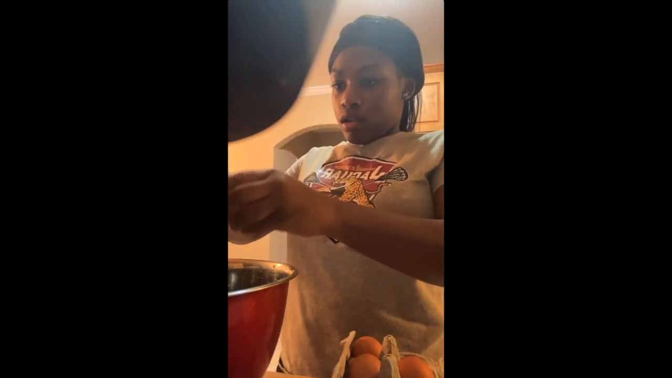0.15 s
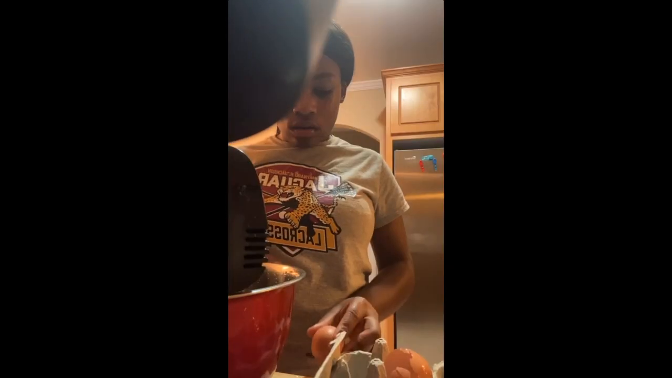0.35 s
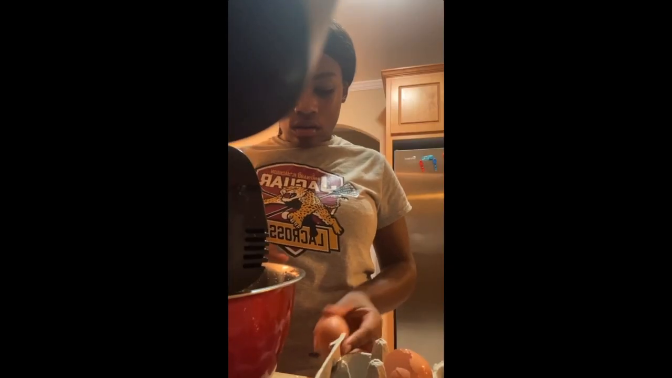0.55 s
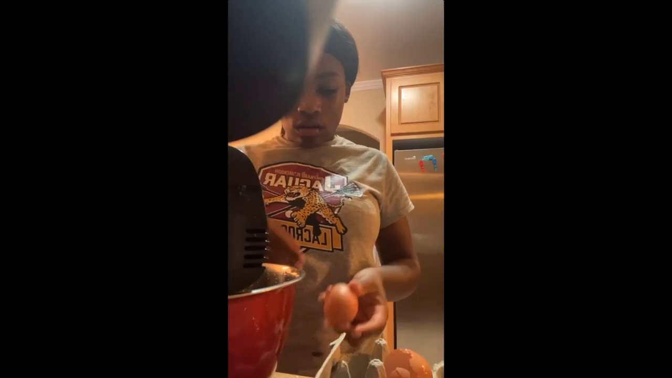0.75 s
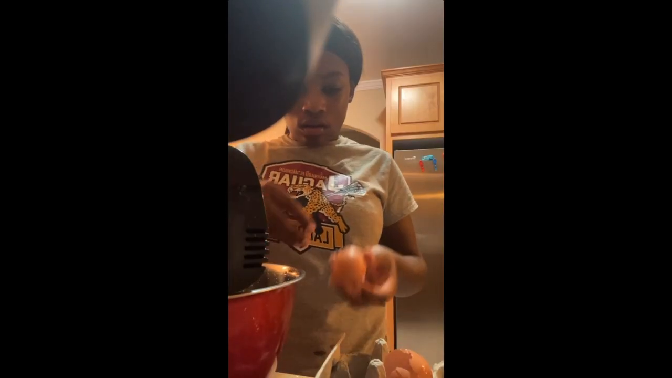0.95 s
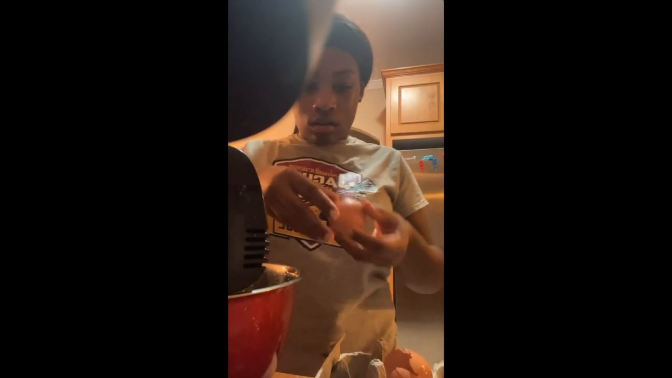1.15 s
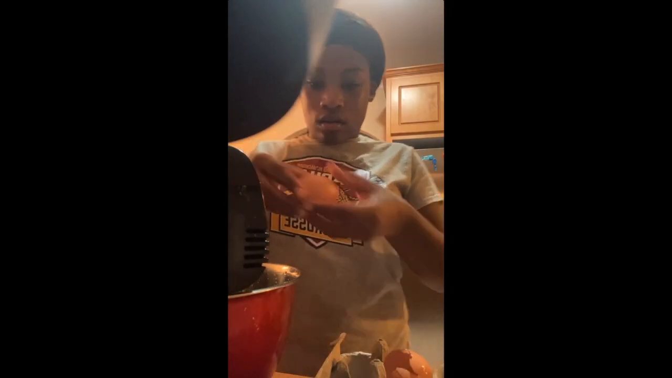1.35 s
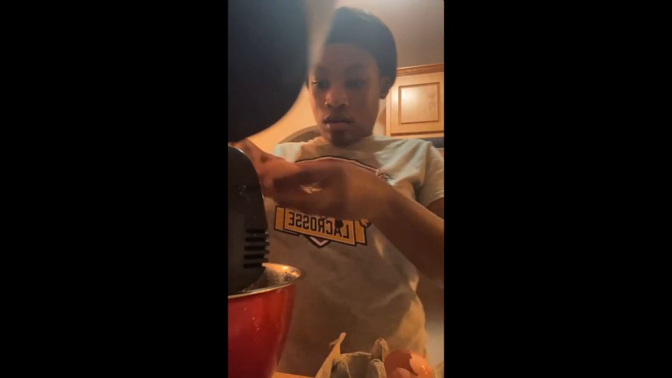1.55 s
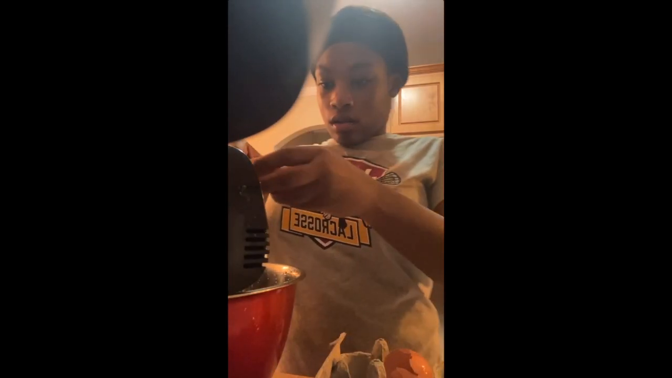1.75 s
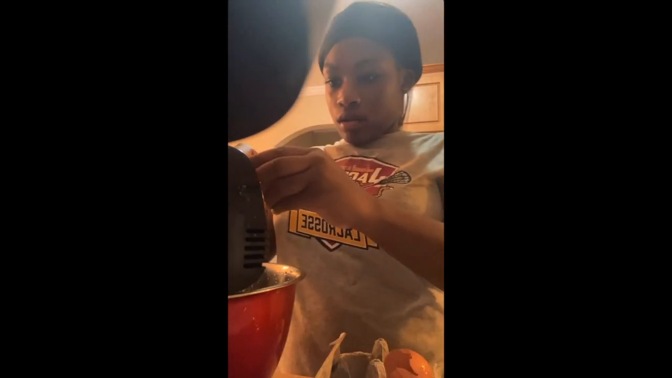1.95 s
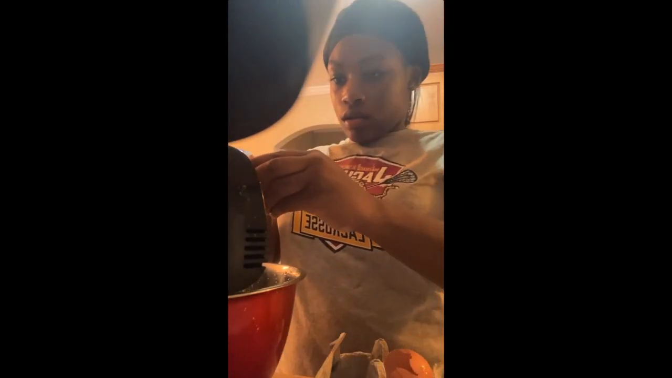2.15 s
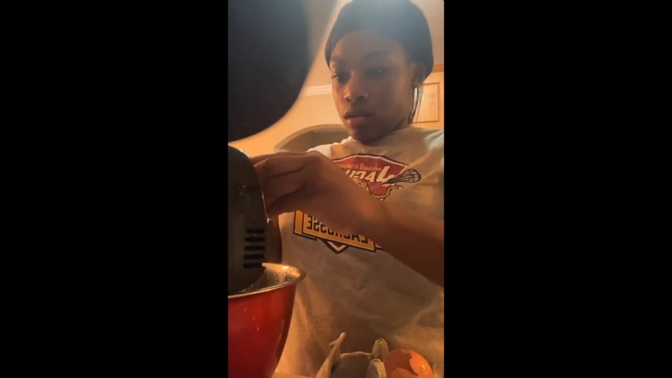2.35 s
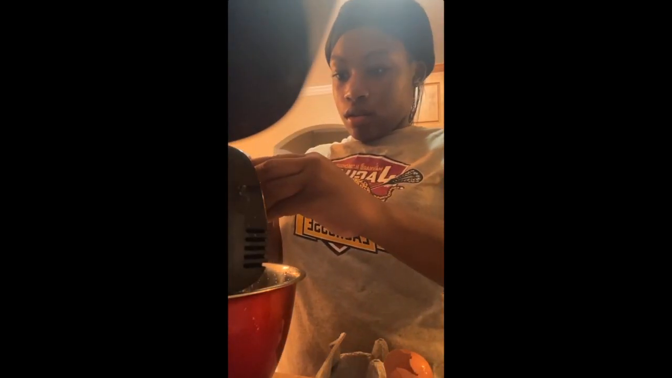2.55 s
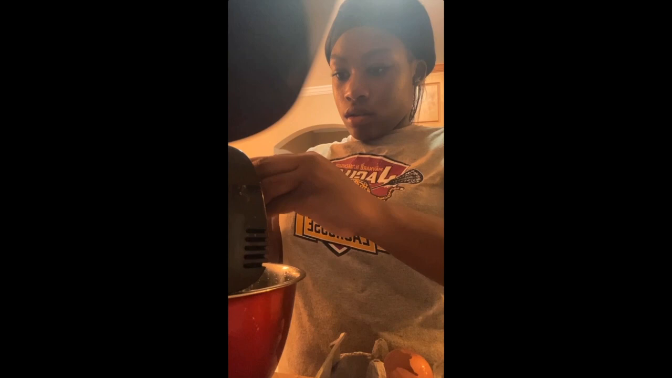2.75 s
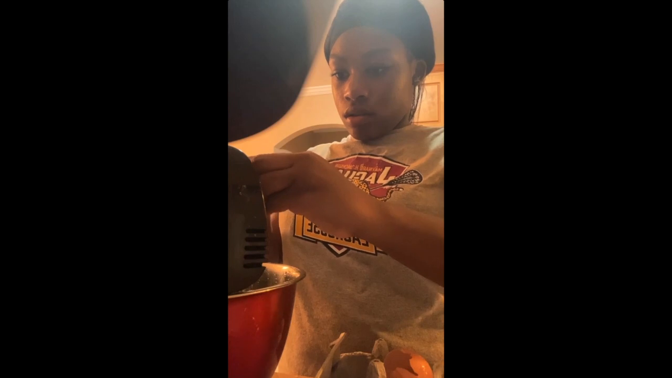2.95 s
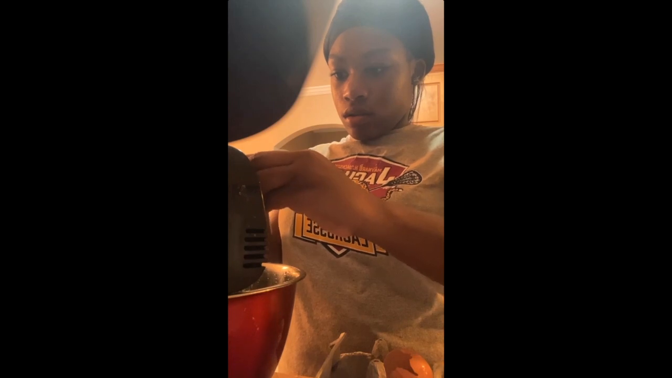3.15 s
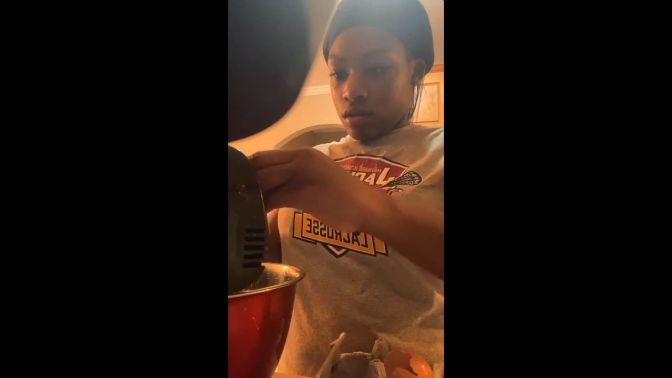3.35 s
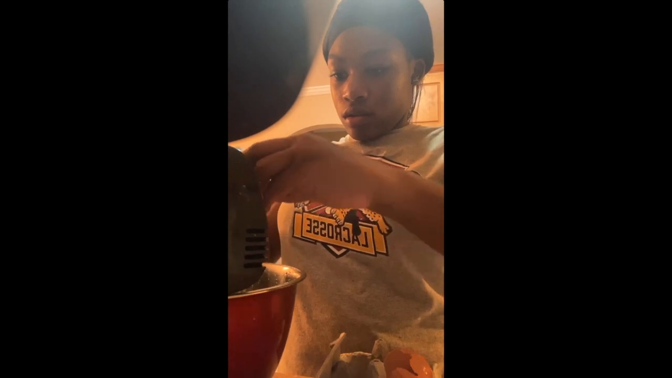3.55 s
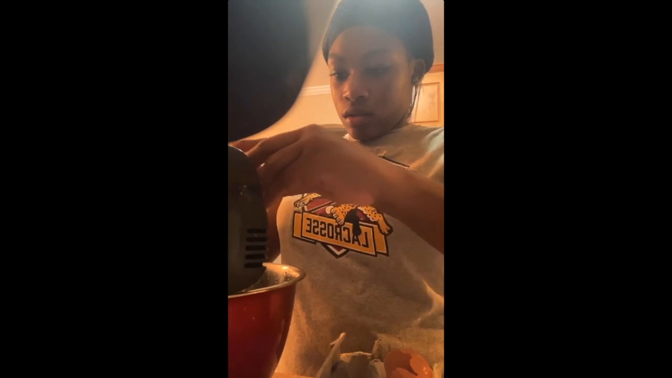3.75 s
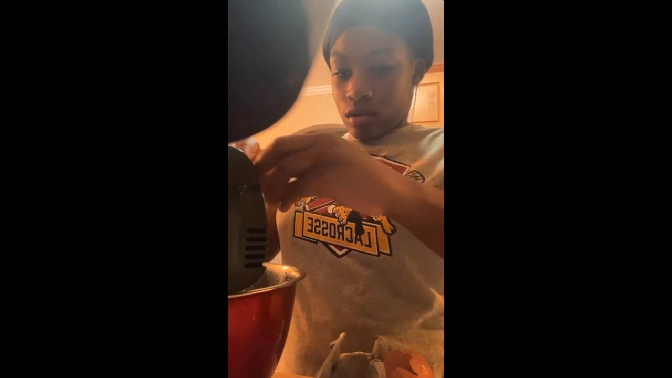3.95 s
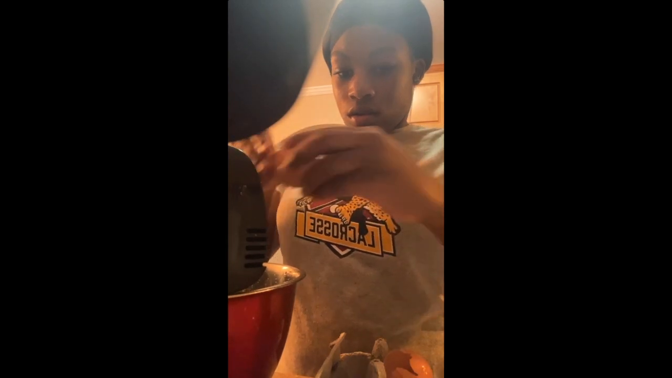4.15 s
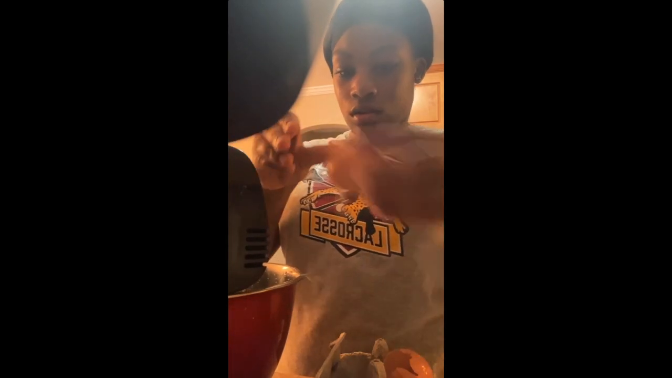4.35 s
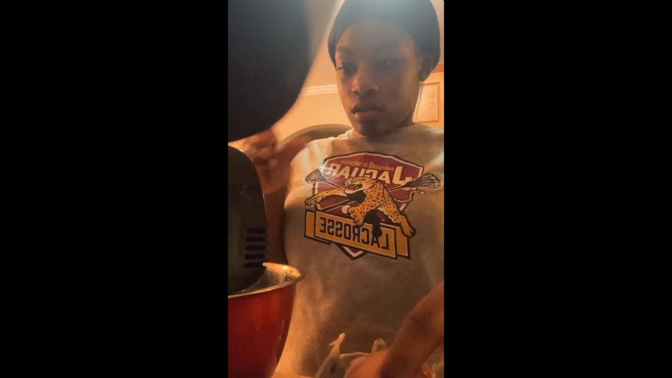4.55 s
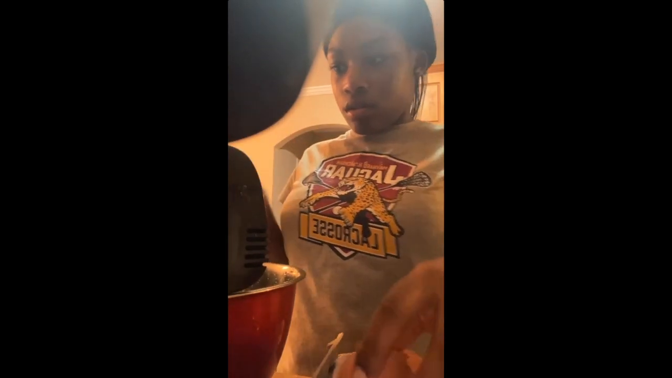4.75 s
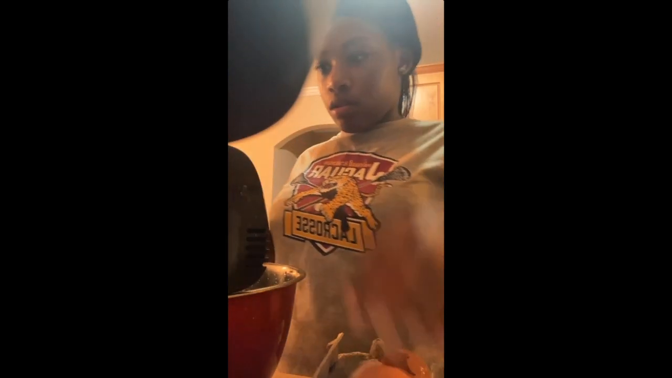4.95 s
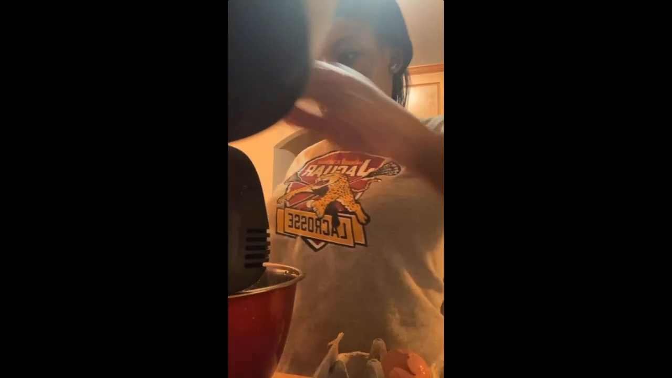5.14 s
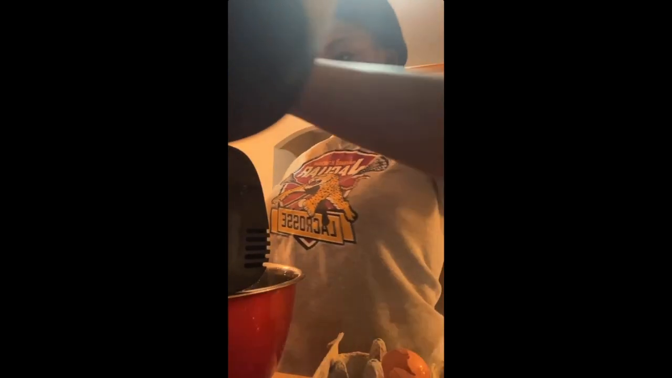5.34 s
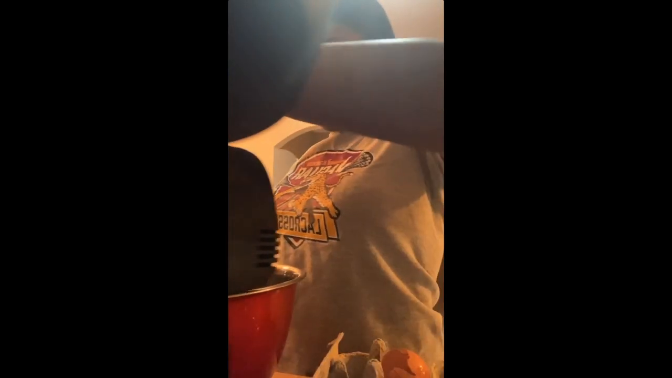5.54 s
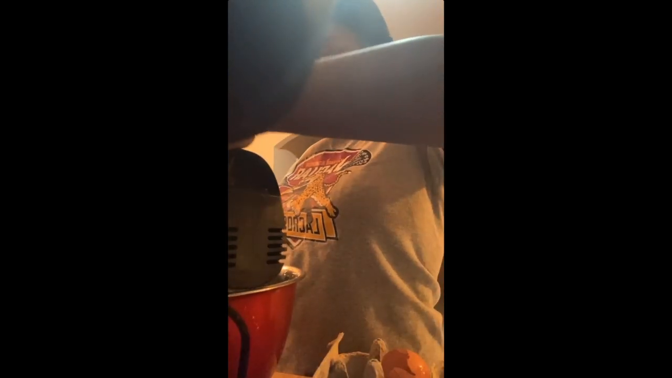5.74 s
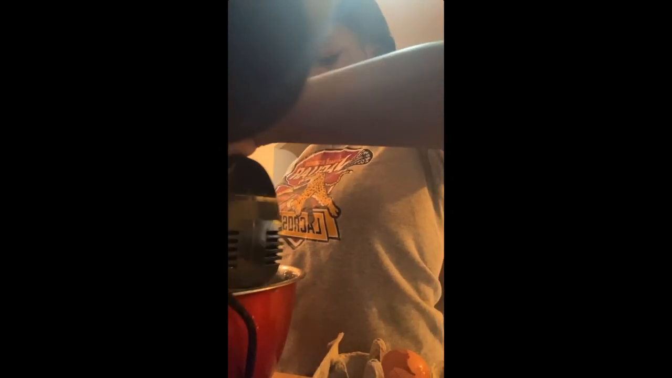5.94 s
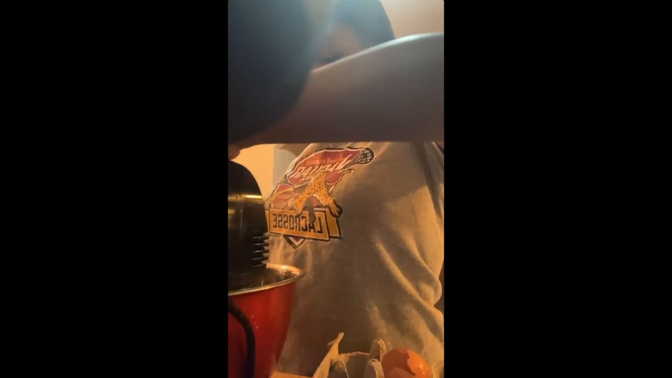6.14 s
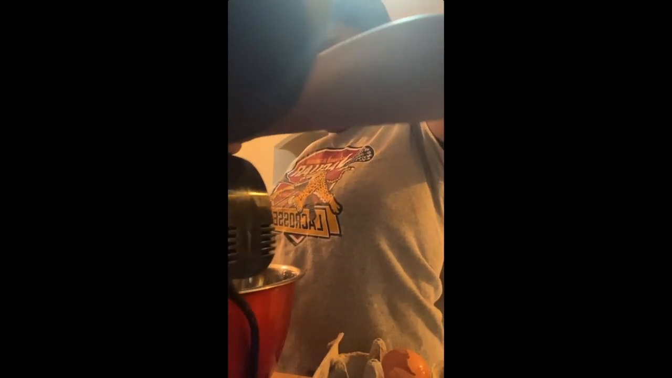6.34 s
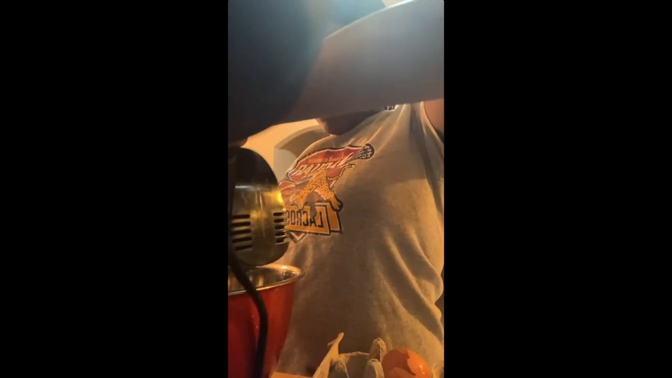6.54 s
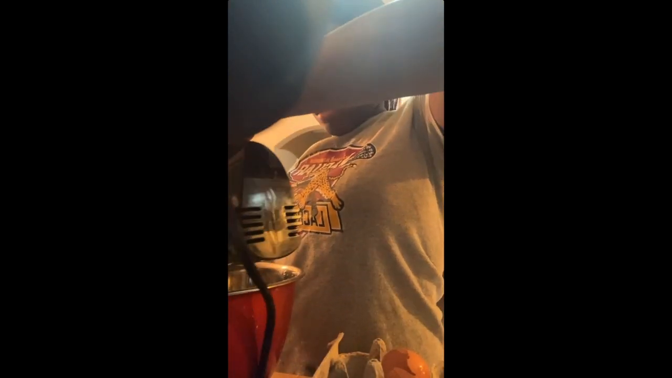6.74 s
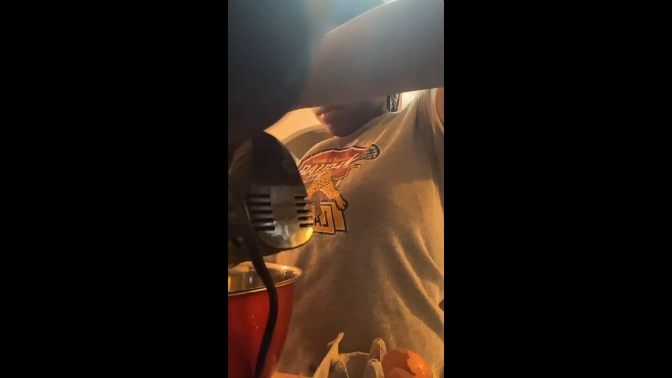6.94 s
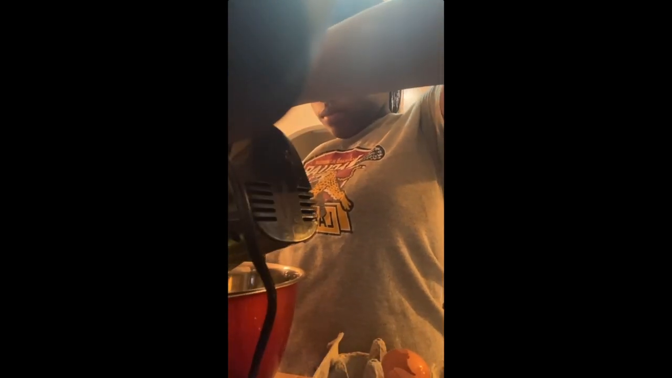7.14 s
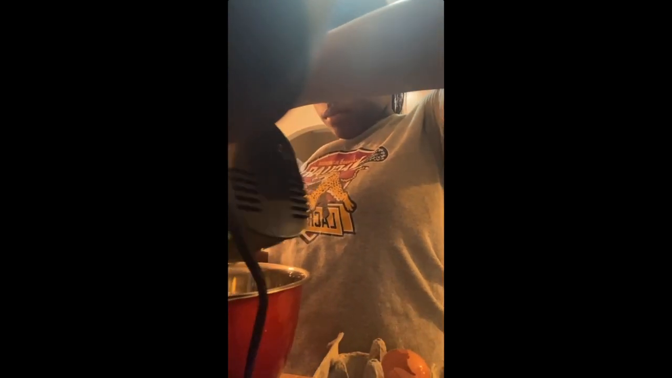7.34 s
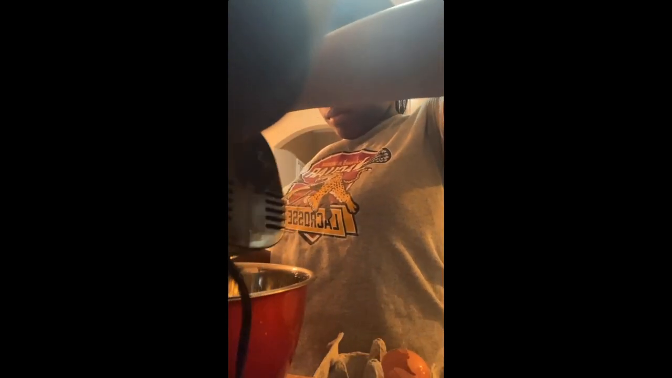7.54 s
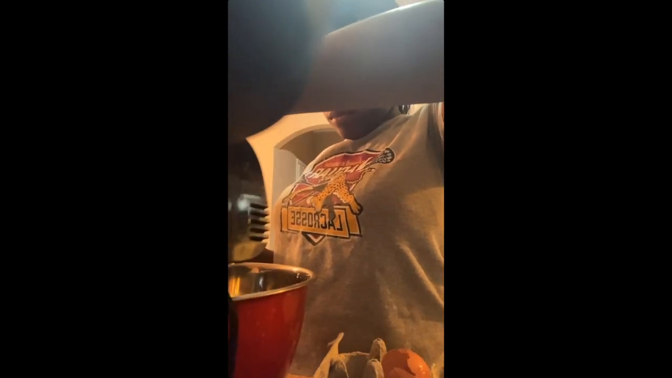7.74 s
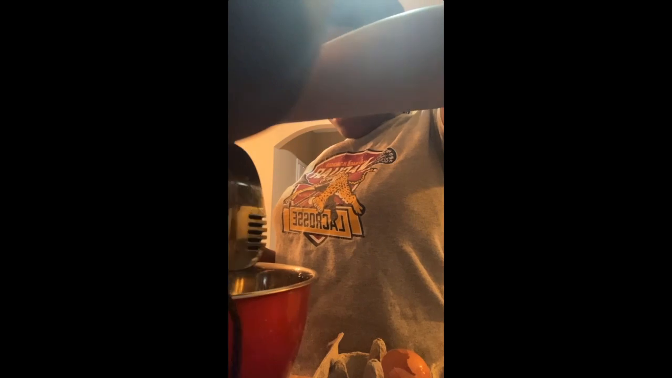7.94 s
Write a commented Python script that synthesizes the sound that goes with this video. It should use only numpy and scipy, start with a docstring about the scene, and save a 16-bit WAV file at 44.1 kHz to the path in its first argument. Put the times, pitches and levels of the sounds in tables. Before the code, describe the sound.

Close phone pickup beside a mixing bowl in a small, slightly reverberant kitchen. Soft rustle and sparse shell ticks come first, then small crunches, clustered cracks and dull knocks as eggs are opened and shells put down. Last, an electric hand mixer switches on, sweeps upward in pitch, and roars steadily with low shaking and fast beater knocks on the bowl, dominating everything.

```python
"""A hand mixer spins up in a quiet kitchen: pulsing air rush, rotor orders as whine, low shaking,
and blades that strike damped bowl modes. Before it, egg shells tick, crackle and scuff in the hands
(noise snaps and short rings) and things knock on counter and bowl (decaying band noise).
Behind lie rustle, room noise and a hum. All is heard through a phone beside the bowl;
its sound drops out for a tenth of a second near the start."""
import sys
import numpy as np
from scipy import signal
from scipy.fft import rfft, irfft
from scipy.io import wavfile
from scipy.ndimage import uniform_filter1d

SR = 44100
rng = np.random.default_rng(int(sys.argv[2]) if len(sys.argv) > 2 else 0)


def makeup_ratio(level_db):
    """Linear amplitude ratio for a level in decibels (20 dB per factor of ten)."""
    decades = np.asarray(level_db, float) / 20
    return 10 ** decades


def wav_out(sig):
    """Save sig, one row per channel (or a flat mono array), as 16-bit PCM at SR to the path in sys.argv[1]."""
    wavfile.write(sys.argv[1], SR, np.round(np.clip(np.atleast_2d(sig).T, -1, 1) * 32767).astype(np.int16))


N = 352359
TIME = np.arange(N) / SR
BURST_S = TIME[:SR // 2]   # time axis of one short event
GEAR = 20.3   # rotor turns per beater turn
# busy hands and clothes: t/s, relative level/dB
HANDS = [(0, -35.5), (.7, -81), (1.4, -46), (2.0, -49.5), (2.45, -40), (2.95, -60), (3.7, -57),
         (5.65, -48.5)]


def rms_one(x):
    """Scale to rms 1."""
    return x / np.sqrt(np.mean(x ** 2) + 1e-20)


def in_time(rows):
    """Columns of a curve table, interpolated to one value a sample."""
    s, *columns = np.transpose(rows)
    return [np.interp(TIME, s, c) for c in columns]


def switch(start_s, end_s, fade_s):
    """1 between two moments, 0 outside, with linear fades."""
    return np.clip(np.minimum(TIME - start_s, end_s - TIME) / fade_s + .5, 0, 1)


def coloured(spectrum):
    """White noise shaped by a spectrum (f/Hz, level/dB); rms 1."""
    hz, level_db = np.transpose(spectrum)
    log_hz = np.log(np.arange(N // 2 + 1) * SR / N + 1)
    gain = makeup_ratio(np.interp(log_hz, np.log(hz), level_db))
    return rms_one(irfft(rfft(rng.standard_normal(N)) * gain, N))


def drift(pole_hz):
    """Slow random walk about 0, rms 1: noise through two equal poles, run at every 40th sample."""
    r = np.exp(-2 * np.pi * pole_hz * 40 / SR)
    noise = rng.standard_normal(N // 40 + 2002)
    slow = signal.lfilter([1], [1, -2 * r, r * r], noise)[2000:]   # settled part
    return np.interp(np.arange(N) / 40, np.arange(len(slow)), rms_one(slow))


def ring(clicks, hz, t60_s):
    """Two-pole resonator: a unit click starts a decaying sine of height 1."""
    r = makeup_ratio(-60 / (max(t60_s, .002) * SR))
    w = 2 * np.pi * hz / SR
    return signal.lfilter([0, np.sin(w)], [1, -2 * r * np.cos(w), r * r], clicks + 1e-18)


def band(x, hz, octaves):
    """First-order band-pass around hz, rms 1."""
    edges_hz = np.clip(hz * 2.0 ** (np.array([-.5, .5]) * octaves), 20, .45 * SR)
    return rms_one(signal.sosfilt(signal.butter(1, edges_hz, "band", fs=SR, output="sos"), x))


def low_pass(x, order, hz):
    """Butterworth low-pass."""
    return signal.sosfilt(signal.butter(order, hz, fs=SR, output="sos"), x)


def add(out, s, sound):
    """Mix a sound in at a time."""
    at = round(s * SR)
    out[at:at + len(sound)] += sound[:N - at]


def dying(t60_s, rise_s):
    """Short rise times exponential fall, cut at half a second."""
    return (1 - np.exp(-BURST_S / rise_s)) * makeup_ratio(-60 * BURST_S / max(t60_s, .01))


def mixer():
    """One rotor angle drives whine, rush pulses, shaking and, through the gear, the blade blows."""
    # rotor speed: t/s, speed/(turns/s)
    rotor_speed = [(5.65, 0), (5.72, 118), (5.8, 217), (5.85, 250), (5.9, 272), (6.0, 303), (6.15, 322),
                   (6.35, 339), (6.55, 351.5), (6.75, 356), (6.95, 356), (7.15, 353), (7.6, 350.4),
                   (7.85, 351.6), (8.0, 355.5)]
    speed, = in_time(rotor_speed)
    turns = np.cumsum(speed) / SR
    loaded = switch(6.06, 9, 0.021)   # beaters in the batter
    motor = rush(speed, turns, loaded) + whine(speed, turns, loaded) + shaking(turns, loaded)
    switch_on = np.clip((TIME - rotor_speed[0][0]) / 0.00099, 0, 1)
    return motor * switch_on + bowl_blows(turns)


def rush(speed, turns, loaded):
    """Fan air: coloured noise, louder with speed and when free, pulsing once a rotor turn."""
    # air rush: f/Hz, relative level/dB
    rush_spectrum = [(29, -58), (50, -15), (520, -3.5), (1780, -16.5), (2680, -11.5), (4040, -14.5),
                     (5150, -20.5), (8970, -26), (11700, -44), (15800, -58)]
    base_db, free_db, db_per_octave = -18.5, 2.5, 7
    pulse_depth = 0.32
    level_db = base_db + free_db * (1 - loaded)
    level_db = level_db + db_per_octave * np.log2((speed + 30) / speed.max())
    pulse = 1 + pulse_depth * np.sin(2 * np.pi * turns)
    return makeup_ratio(level_db + 1.4 * drift(20)) * coloured(rush_spectrum) * pulse


def whine(speed, turns, loaded):
    """Sines at rotor orders, height following speed, lifted where they pass a housing resonance."""
    # housing resonance: f/Hz, width/Hz, lift/dB
    housing_modes = [(3170, 130, 20)]
    # per rotor order at full speed, ahead of lift and drift: level/dB
    free_levels = (-18.5, -23.5, -33.5, -42)
    loaded_levels = (-30, -37, -61, -57)
    out = np.zeros(N)
    for order, free_db, loaded_db in zip((1, 12, 24, 36), free_levels, loaded_levels):
        level_db = free_db + (loaded_db - free_db) * loaded
        for hz, width_hz, lift_db in housing_modes:
            level_db = level_db + lift_db / (1 + ((order * speed - hz) / width_hz) ** 2)
        height = makeup_ratio(level_db + 3.5 * drift(30)) * speed / speed.max()
        phase = 2 * np.pi * order * turns + .3 * np.sqrt(order) * drift(60)
        out += height * np.sin(phase)
    return out


def shaking(turns, loaded):
    """Low sines at beater orders; the counter shakes most while the mixer leans on the bowl."""
    # shaking: multiple of beater speed, relative level/dB
    shake_orders = [(4, -1), (6, -0.5), (10, -0.5), (14, -7.5)]
    loose_db, lean_db = -34, -26.5
    depth = makeup_ratio(loose_db) * loaded + makeup_ratio(lean_db) * switch(6.08, 7.25, 0.022)
    out = np.zeros(N)
    for order, level_db in shake_orders:
        height = depth * makeup_ratio(level_db + 3.9 * drift(17.0))
        out += height * np.sin(2 * np.pi * round(order) * turns / GEAR + 0.31 * drift(4.6))
    return out


def bowl_blows(turns):
    """Blade blows plus the rattle of the bowl after each; batter softens the contact (low-pass)."""
    start_turns = -0.0228   # beater angle at switch-on
    blows = beater(start_turns + turns / GEAR)
    shaken = uniform_filter1d(np.abs(blows), size=200, origin=99)   # trailing mean
    rattle = 0.4 * shaken * band(rng.standard_normal(N), 1300, 1.8)
    return low_pass(blows + rattle, 3, 2300)


def beater(angle):
    """Each blade on the wall thuds and strikes every bowl mode; the rim gives one higher clack."""
    # bowl modes: f/Hz, relative level/dB, t60/s
    bowl_modes = [(380, 0.5, 0.07), (424, 2, 0.019), (508, -16.5, 0.15), (1020, -26, 0.15),
                  (1690, -8, 0.01)]
    # wall contacts, one a beater turn: from t/s, to t/s, first angle/turns, last angle/turns, level/dB
    wall_contacts = [(6.075, 6.46, .66, .645, -1), (6.46, 7.2, .635, .65, -5), (6.06, 6.075, .5, .5, -3),
                     (6.12, 6.27, .425, .435, -2.5), (6.27, 6.56, .44, .435, -7),
                     (6.77, 7.19, .44, .46, -6.5), (6.1, 6.31, .175, .17, -3.5),
                     (6.31, 6.49, .165, .155, -7), (6.81, 7.12, .155, .17, -5.5),
                     (7.26, 7.48, .51, .33, -2.5), (7.48, 7.93, .31, .18, -3.5),
                     (7.52, 7.99, .58, .355, -4), (7.26, 7.34, .04, 0, -5), (7.39, 7.46, .2, .13, -5)]
    # rim contacts: from t/s, to t/s, first angle/turns, last angle/turns, level/dB
    rim_rows = [(6.505, 6.857, .42, .31, -4)]
    at, blow_db = meetings(angle, wall_contacts)
    chance = rng.standard_normal((200, len(bowl_modes) + 1))[:len(at)].T
    out = np.zeros(N)
    for k, (hz, level_db, t60_s) in enumerate(bowl_modes):
        sign = (-1) ** k   # neighbouring modes start in opposite sense
        out += ring(clicks_at(at, sign * makeup_ratio(blow_db + level_db - 5.5 + 3.0 * chance[k])), hz, t60_s)
    thuds = clicks_at(at, makeup_ratio(blow_db + 10 + chance[-1]))
    out += signal.fftconvolve(thuds, thud())[:N]
    at, blow_db = meetings(angle, rim_rows)
    return out + ring(clicks_at(at, makeup_ratio(blow_db)), 1003, .03)


def thud():
    """The wall gives under the blade: a short sine whose pitch drops at once."""
    end_hz, fall_hz, fall_s = 420, 380, 0.003
    cycles = end_hz * BURST_S + fall_hz * fall_s * (1 - np.exp(-BURST_S / fall_s))
    return np.sin(2 * np.pi * cycles) * dying(.022, .0015)


def clicks_at(at, heights):
    """Single-sample clicks in silence."""
    clicks = np.zeros(N)
    clicks[at] = heights
    return clicks


def meetings(angle, rows):
    """Samples at which a blade passes its point of contact, and each blow in dB."""
    at, blow_db = [], []
    for start_s, end_s, first, last, level_db in rows:
        turn = np.floor(angle - np.interp(TIME, (start_s, end_s), (first, last)))
        inside = (TIME[1:] > start_s) & (TIME[1:] < end_s)
        hits = np.flatnonzero((np.diff(turn) > 0) & inside)
        at = np.r_[at, hits]
        blow_db = np.r_[blow_db, np.full(len(hits), level_db)]
    return at.astype(int), blow_db


def ticks():
    """Shell ticks and taps: a short rough ring, a broad crack, a faint longer tail."""
    # ticks: t/s, relative level/dB, ring f/Hz
    tick_rows = [(0.6206, -26.5, 4350), (1.63, -25.5, 2200), (1.807, -24.5, 1250), (1.869, -20.5, 7060),
                 (2.311, -17.5, 1300), (2.345, -22, 1650), (3.05, -20, 1810), (3.0686, -15, 2010),
                 (3.291, -34.5, 3890), (3.321, -25, 3840), (3.337, -20, 1520), (3.3573, -18, 1700),
                 (3.477, -18, 4600), (3.5086, -20.5, 3750), (3.605, -13.5, 3500), (3.632, -15, 1930),
                 (3.704, -16, 5680), (3.73, -15, 1990), (3.663, -25, 3700), (3.758, -24, 1870),
                 (3.797, -26, 5770), (3.8923, -15, 1400), (3.928, -19, 1300), (4.427, -13, 1730),
                 (4.5157, -0.5, 1020), (4.5489, -1, 1100), (4.571, -4.5, 780), (4.8802, -19, 1050)]
    out = np.zeros(N)
    for s, level_db, hz in tick_rows:
        noise = rng.standard_normal((2, SR // 2))
        crack_hz = 2700 * makeup_ratio(4.5 * rng.standard_normal())   # no two cracks share a colour
        crack = band(noise[1], crack_hz, 2.4)
        tone = 2 * np.sin(2 * np.pi * hz * BURST_S) + band(noise[0], hz, 0.68)
        crack_fall = makeup_ratio(-1.5) * dying(0.021, 0.00048) + makeup_ratio(-21.5) * dying(0.12, 0.0035)
        sound = tone * dying(0.018, 0.0016) + crack * crack_fall
        add(out, s - .001, makeup_ratio(level_db - 5.5) * sound)
    return out


def crackle(cracks):
    """Fine clumped snaps dealt to short rings: larger near cracks, dense while a shell caves in."""
    # a shell caves in: t/s, length/s, relative level/dB
    crunch_rows = [(2.325, 0.035, -36.5), (3.043, 0.064, -37.5), (3.322, 0.057, -47), (4.414, 0.0098, -26)]
    busy_db, = in_time(HANDS)
    caving = sum(makeup_ratio(db) * switch(s, s + length_s, 0.016) for s, length_s, db in crunch_rows)
    near_cracks = 2.0 * uniform_filter1d(np.abs(cracks), size=3500)
    sizes = (makeup_ratio(busy_db + 2.0) + near_cracks + caving) * makeup_ratio(5.2 * rng.random(N))
    snaps_per_s = 130.0 * makeup_ratio(5.0 * drift(8)) + 1500 * (caving > 0)
    snaps = (rng.random(N) < snaps_per_s / SR) * sizes
    dealt = rng.integers(0, 12, N)
    out = np.zeros(N)
    for k, hz in enumerate(np.geomspace(1300, 9500, num=12)):
        out += ring(snaps * (dealt == k), hz, 11.0 / hz)
    return out


def scuffs():
    """Shell dragged or squeezed: uneven slips under a swell, ringing at a pitch, with hiss."""
    # scuffs: t/s, length/s, relative level/dB, ring f/Hz, hiss level/dB
    scuff_rows = [(1.094, 0.62, -54, 2000, -40), (3.802, 0.066, -28, 1450, -17.5),
                  (3.917, 0.089, -30.5, 1250, -18), (4.944, 0.062, -29, 815, -18),
                  (5.051, 0.023, -30, 1070, -3.5), (5.09, 0.021, -26, 920, -5)]
    slips_per_s, slip_t60_s = 600, .025
    out, count = np.zeros(N), len(BURST_S)
    for s, length_s, level_db, hz, hiss_db in scuff_rows:
        swell = np.sin(np.pi * np.clip(BURST_S / length_s, 0, 1)) ** .5
        slips = (rng.random(count) < slips_per_s / SR) * rng.standard_normal(count) * swell
        rings = ring(slips, hz, slip_t60_s)
        hiss_height = swell + uniform_filter1d(np.abs(rings), size=200)
        hiss = band(rng.standard_normal(count), 2660, 1.3) * hiss_height
        add(out, s, makeup_ratio(level_db) * (rings + makeup_ratio(hiss_db) * hiss))
    return out


def knocks():
    """Heavier knocks: dense band rattle; low, long-ringing bodies build up more slowly."""
    # knocks: t/s, relative level/dB, centre f/Hz, nominal width/octaves, t60/s
    knock_rows = [(0.062, -30.5, 2500, 15, 0.076), (0.253, -33, 990, 4.8, 1),
                  (1.301, -30.5, 2780, 10.5, 0.4), (2.632, -25, 544, 4.4, 0.79),
                  (2.687, -20, 110, 0.84, 0.66), (2.697, -14.5, 477, 1.32, 0.62),
                  (3.572, -25, 380, 1.6, 0.095), (4.012, -3.5, 830, 2.56, 0.35),
                  (4.018, -17.5, 144, 1, 0.62), (4.511, -6, 407, 7.7, 0.098),
                  (4.796, -14.5, 340, 10.7, 0.097), (5.022, -5, 580, 3, 0.046),
                  (5.268, -11.5, 160, 0.3, 0.14), (5.469, -25, 143, 6.2, 1), (5.657, -8.5, 535, 2.75, 0.4),
                  (5.689, -4.5, 420, 4.3, 0.078), (5.7, -12.5, 79, 2.8, 0.41)]
    out = np.zeros(N)
    for s, level_db, hz, octaves, t60_s in knock_rows:
        rattle = band(rng.standard_normal(SR // 2), hz, octaves)
        rattle = band(rattle, hz, 0.45 * octaves)
        fall = dying(t60_s, 0.0035 * t60_s + 0.18 / hz)
        add(out, s - .003, makeup_ratio(level_db - 4.0) * rattle * fall)
    return out


def kitchen(x):
    """Room reflections: decaying noise of unit energy after 4 ms, duller than the direct sound."""
    t60_s = 0.66
    t = TIME[:SR]
    tail = rng.standard_normal(SR) * makeup_ratio(-60 * t / t60_s) * (t > .004)
    tail = signal.lfilter([1], [1, -.5], tail)
    return signal.fftconvolve(x, tail / np.sqrt(np.sum(tail ** 2)))[:N]


def background():
    """Coloured room noise, a wavering appliance hum, grainy rustle of hands and clothes."""
    # rustle: f/Hz, relative level/dB
    rustle_spectrum = [(2000, 15.5), (9000, 0.5), (13000, -33)]
    # room noise: f/Hz, relative level/dB
    room_spectrum = [(24, -58), (40, 6), (112, -1.5), (720, -7), (2390, -27), (3910, -30), (11000, -43),
                     (14300, -91)]
    hum_hz, hum_db, room_db = 122.7, -46.5, -44.5
    hum = makeup_ratio(hum_db + 1.0 * drift(1.6)) * np.sin(2 * np.pi * hum_hz * TIME)
    rustle_db = in_time(HANDS)[0] - 10 + 0.96 * drift(45)
    rustle = makeup_ratio(rustle_db) * coloured(rustle_spectrum)
    return makeup_ratio(room_db) * coloured(room_spectrum) + hum + rustle


def scene():
    """Near sources with their reflections, plus background; hand sounds lack extreme treble."""
    cracks = ticks()
    hands = low_pass(cracks + crackle(cracks) + knocks() + scuffs(), 4, 9050)
    near = hands + mixer()
    kitchen_db = -15
    return (near + makeup_ratio(kitchen_db) * kitchen(near) + background())[None]


def band_limit(x):
    """A steep low-pass at the top of the band."""
    return signal.sosfilt(signal.butter(12, 16430, fs=SR, output="sos"), x)


def record(dry):
    """Phone: low cut, peaks and notches of housing and nearby surfaces, soft overload, dropout."""
    # phone housing and nearby surfaces: f/Hz, width/Hz, gain/dB
    phone_modes = [(1867, 320, 7), (2733, 1240, -18), (3023, 144, 8), (3640, 300, 5), (4013, 227, 9),
                   (5170, 69, -19.5), (6390, 106, -10.5), (7060, 99, -12)]
    x = signal.sosfilt(signal.butter(3, 54.3, "high", fs=SR, output="sos"), dry)
    for hz, width_hz, gain_db in phone_modes:
        w, a = 2 * np.pi * hz / SR, np.pi * width_hz / SR
        g = makeup_ratio(gain_db / 2)
        x = signal.lfilter([1 + a * g, -2 * np.cos(w), 1 - a * g],
                           [1 + a / g, -2 * np.cos(w), 1 - a / g], x)
    drop_start_s, drop_end_s = .1555, .252
    present = (TIME < drop_start_s) | (TIME > drop_end_s)
    return band_limit(0.89 * np.tanh(x / 1.008) * present)


dry = scene()
out = record(dry)
wav_out(out)
```